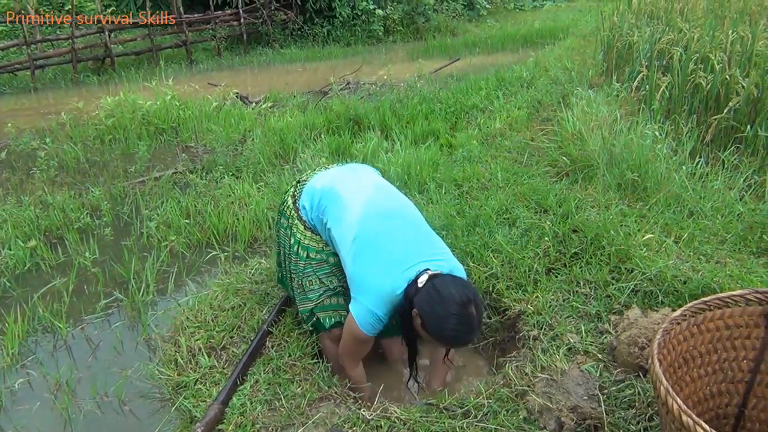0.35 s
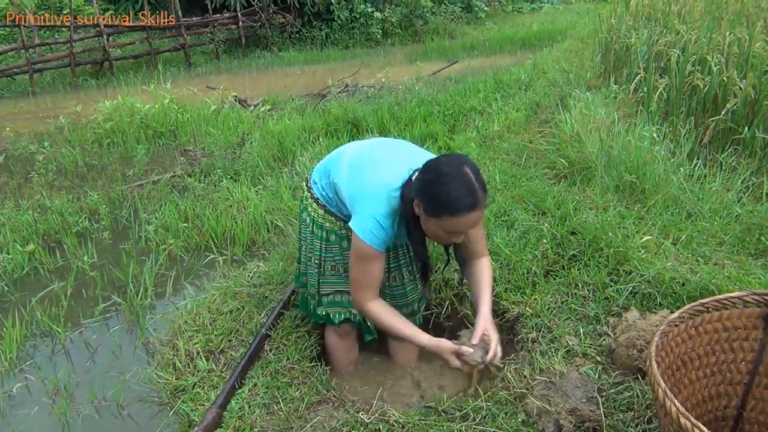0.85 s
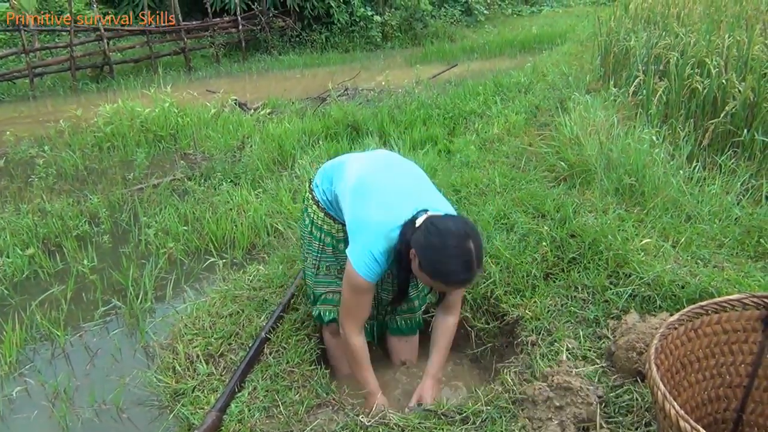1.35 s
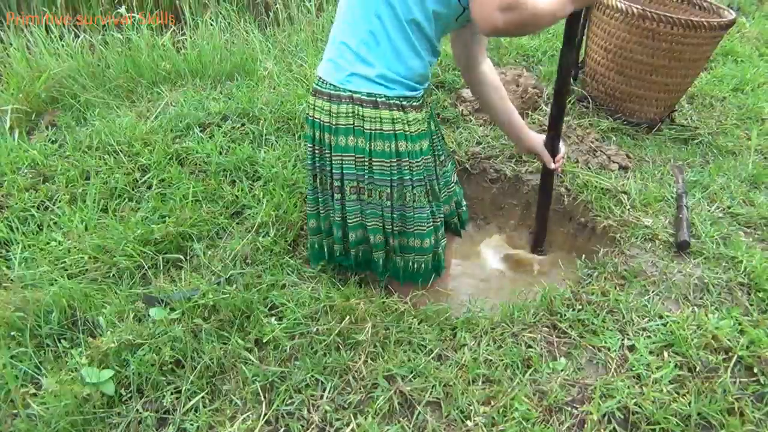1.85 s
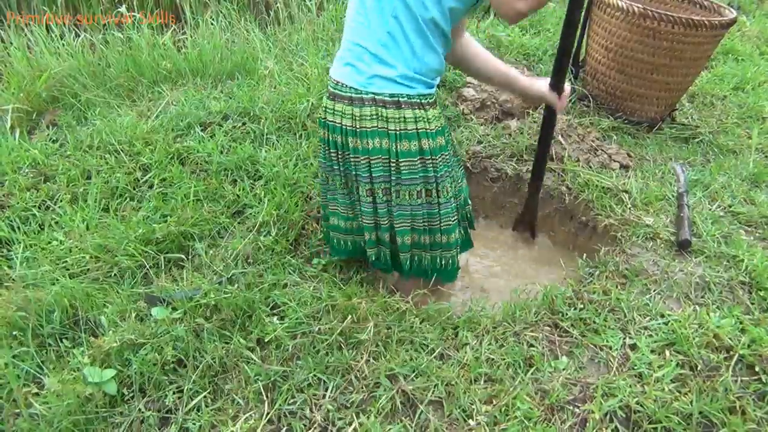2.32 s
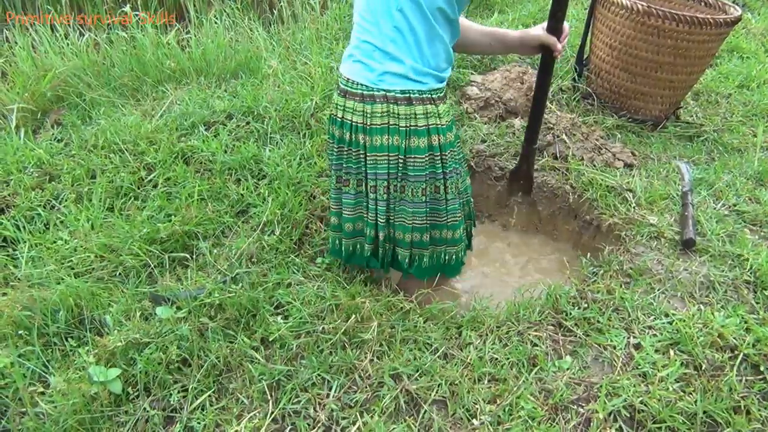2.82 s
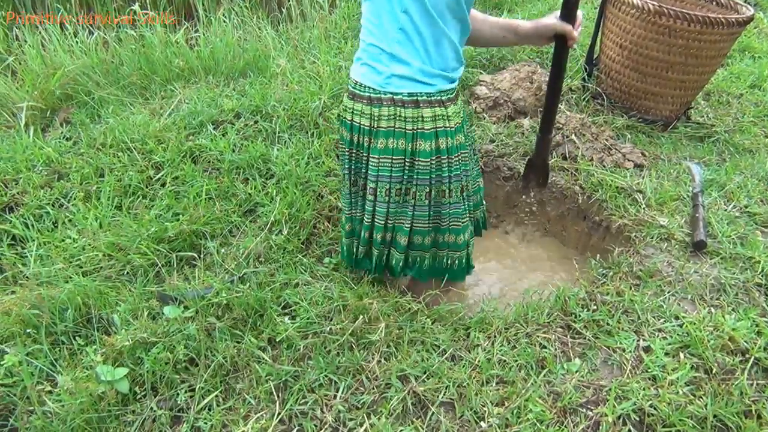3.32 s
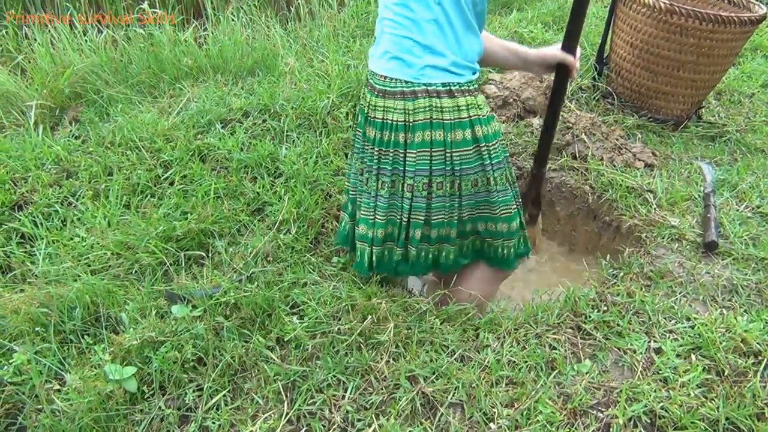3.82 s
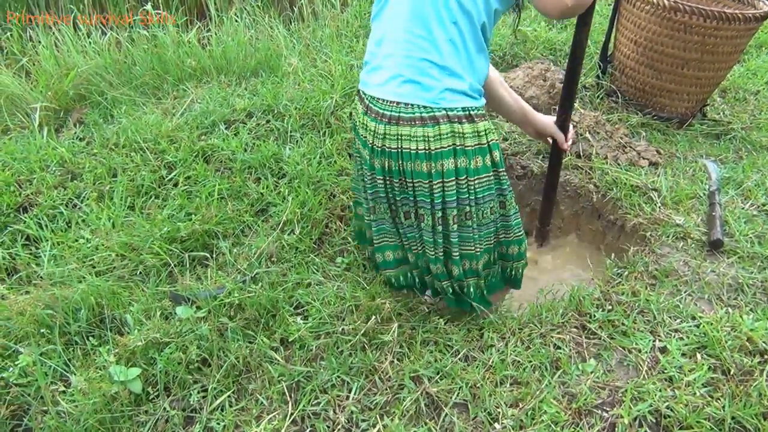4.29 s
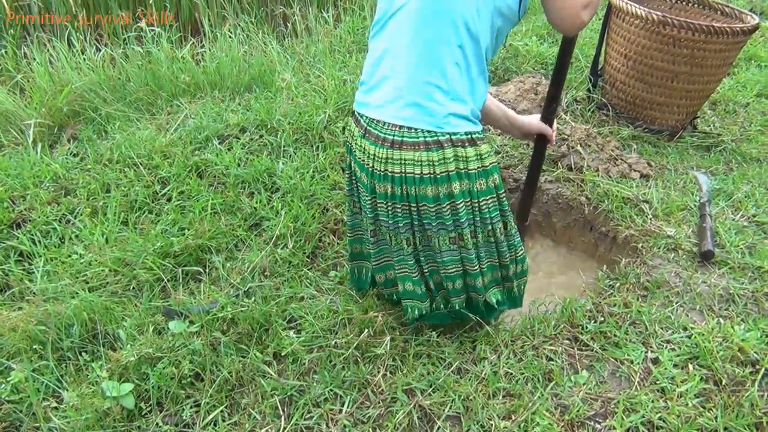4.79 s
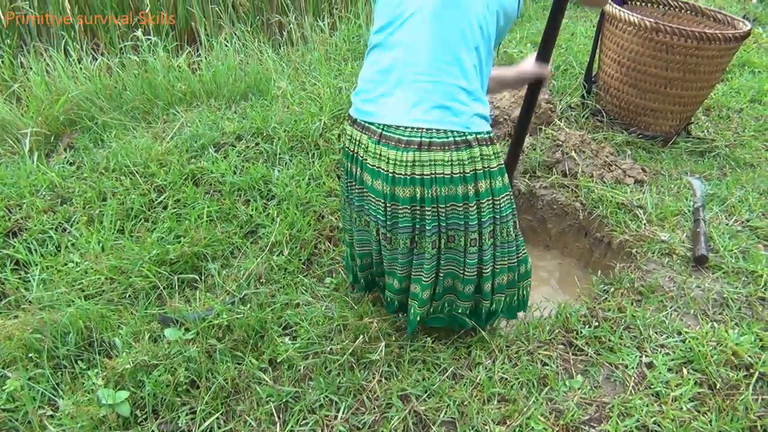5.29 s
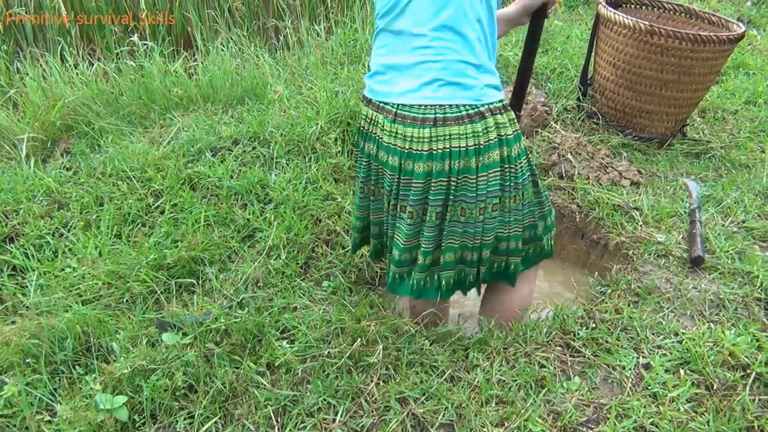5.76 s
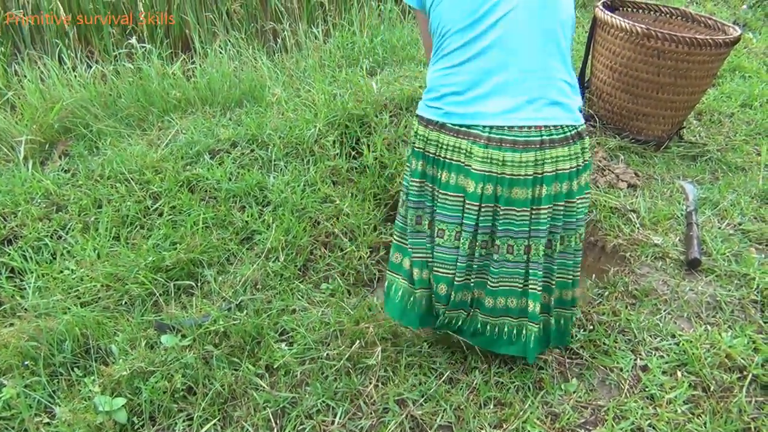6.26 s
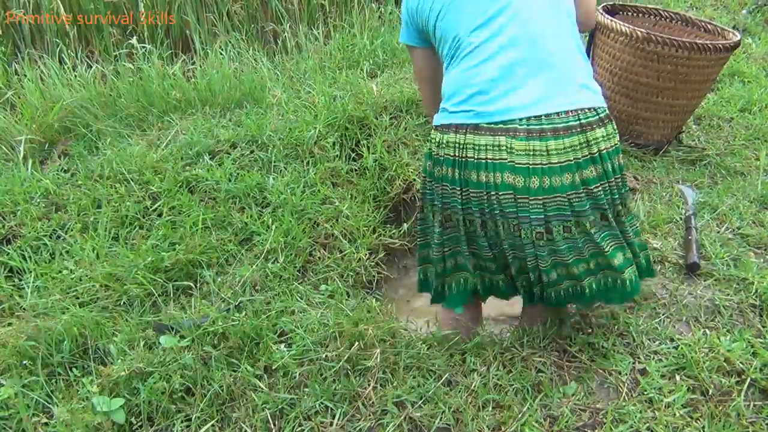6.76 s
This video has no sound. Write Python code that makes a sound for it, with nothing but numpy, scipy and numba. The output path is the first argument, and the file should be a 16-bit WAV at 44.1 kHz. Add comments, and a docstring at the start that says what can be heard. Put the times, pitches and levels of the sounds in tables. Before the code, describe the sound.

Wet scooping, drips and a soft mud thud give way to sharp watery plunges and bubbling plops, over a thin buzzing insect chorus outdoors.

```python
"""Muddy pit in a wet field

Hands scoop mud and drop it on the bank; after a brief silence a pole jabs the flooded earth.
Splashes and sloshes are clouds of damped sines: large bubbles, small bubbles and fine spray.
Single drops, bubbles and dull thuds are damped sines too. Insects sing all around in narrow bands
of pulsing noise, over the soft hiss of the field."""
import sys
import numpy as np
from scipy import signal
from scipy.fft import rfft, irfft, next_fast_len
from scipy.io import wavfile
from scipy.ndimage import uniform_filter1d
from numba import njit

SR = 44100
rng = np.random.default_rng(int(sys.argv[2]) if len(sys.argv) > 2 else 0)


def field_ratio(decibels):
    """Amplitude ratio for a level in dB (20 dB per decade); scalars and array-likes work."""
    return 10 ** (np.asarray(decibels, dtype=float) / 20)


def wav_out(sig):
    """Save sig, one row per channel (or a flat mono array), as 16-bit PCM at SR to the path in sys.argv[1]."""
    wavfile.write(sys.argv[1], SR, np.round(np.clip(np.atleast_2d(sig).T, -1, 1) * 32767).astype(np.int16))


N = 303408
TIME = np.arange(N) / SR
# The brief silence. Times in seconds: fade-out starts, silence starts, silence ends, sound is fully back.
GAP_S = (1.659, 1.662, 1.699, 1.706)


@njit
def ring(start, hz, cycles, glide, size):
    """Damped resonance: each sine swells in about a cycle and dies 60 dB in its cycles, gliding in pitch."""
    out = np.zeros(N)
    for k in range(len(start)):
        length = int(cycles[k] * SR / hz[k]) + 2
        step = np.exp(2j * np.pi * hz[k] / SR - np.log(1000) / length)
        # the pitch moves evenly from hz to glide * hz
        bend = np.exp(2j * np.pi * hz[k] * (glide[k] - 1) / SR / length)
        phasor = size[k] + 0j
        shut = 1.
        for i in range(start[k], min(start[k] + length, N)):
            out[i] += phasor.imag * (1 - shut)
            shut *= 1 - 2 * hz[k] / SR
            phasor *= step
            step *= bend
    return out


def shape(x, points):
    """Linear filtering: the spectrum is weighted by (Hz, dB) points joined on a log frequency axis."""
    hz, db = np.transpose(points)
    size = next_fast_len(N)
    f = np.arange(size // 2 + 1) * SR / size + 1  # 1 Hz up, to avoid log 0
    gain = field_ratio(np.interp(np.log(f), np.log(hz), db))
    return irfft(rfft(x, size) * gain, size)[..., :N]


def unit(x):
    """Power normalisation: scale to rms 1."""
    return x / np.sqrt(np.mean(x ** 2))


def walk(rate):
    """Slow random modulation: random levels, rate of them a second, joined by ramps; rms 1."""
    k = int(SR / rate)
    held = np.repeat(rng.standard_normal(N // k + 1), k)
    return unit(uniform_filter1d(held, k)[:N])


def chorus():
    """Band-limited noise, amplitude modulated, for each kind of insect; broadband noise for the field's hiss."""
    # Spectrum of the hiss. Each row: frequency in Hz, relative density in dB per Hz.
    field = [(40, -2.5), (800, 1.5), (3000, -7.5), (16000, -12.5)]
    # Insect bands. Each row: centre in Hz, width in Hz, mean level in dB before the silence, the same after.
    insects = [(3447, 330, -56.5, -53.5), (5010, 530, -52, -52.5), (8600, 830, -58, -59.5),
               (14000, 120, -71, -74)]
    throb_hz, throb_db = 24.3, 2
    mid_side = field_ratio(-52) * unit(shape(rng.standard_normal((2, N)), field))
    for hz, width, before_db, after_db in insects:
        band = [(hz - 3 * width, -40), (hz - width, -3), (hz, 0), (hz + width, -40)]
        db = np.where(TIME < GAP_S[1], before_db, after_db)
        db = db + walk(3) + 2 * walk(240)  # slow drift and fine pulsing
        throb_phase = 2 * np.pi * np.cumsum(throb_hz + walk(2.07)) / SR
        db = db + throb_db * np.cos(throb_phase)
        mid_side = mid_side + field_ratio(db) * unit(shape(rng.standard_normal((2, N)), band))
    mid, side = mid_side
    return mid + 0.5 * side * np.array([[1], [-1]])


def thuds():
    """Heavily damped impact: wet earth gives four cycles that sink towards half their pitch."""
    # Mud lumps landing and the pole striking bottom. Each row: start in seconds, strength in dB, starting pitch in Hz.
    thud = [(1.044, -19.5, 120), (1.217, -28, 99), (3.53, -9.5, 205)]
    s, db, hz = np.transpose(thud)
    ones = np.ones(len(s))
    return ring((s * SR).astype(np.int64), hz, 4 * ones, .5 * ones, field_ratio(db))


def chirps():
    """Rising bubble resonance: a thin drip's bubble climbs steeply in pitch as it nears the surface."""
    # Each row: start in seconds, strength in dB, starting pitch in Hz.
    chirp = [(0.288, -41, 1270), (0.394, -43, 1430)]
    t60_s, climb_hz_per_s = 0.09, 58000
    s, db, hz = np.transpose(chirp)
    glide = 1 + climb_hz_per_s * t60_s / hz
    return ring((s * SR).astype(np.int64), hz, t60_s * hz, glide, field_ratio(db))


def ticks():
    """Impact burst: a flung drop lands and six droplets ring around its pitch within 5 ms."""
    # Each row: start in seconds, strength of the first droplet in dB, its starting pitch in Hz.
    tick = [(0.4986, -21.5, 1700), (0.778, -18, 12200), (0.8781, -13.5, 3280), (1.1022, -17, 3400),
            (1.61, -10.5, 6670), (2.1329, -14.5, 7900), (2.2282, -15.5, 4740), (2.283, -21, 9100),
            (2.396, -10.5, 3900), (2.467, -15.5, 4370), (2.9684, -7, 2720), (3.142, -22, 4040),
            (4.077, -22.5, 3520), (4.3293, -10, 10740), (4.7022, -6.5, 3400), (5.3935, -12.5, 3910),
            (5.4984, -11.5, 3380), (5.5097, -15, 2590), (6.224, -18.5, 2550)]
    s, db, hz = np.transpose(tick)[..., None]
    late, pitch, weakness = np.moveaxis(rng.random((len(s), 6, 3)), 2, 0)
    # the first droplet has the listed time, pitch and strength
    late[:, 0], pitch[:, 0], weakness[:, 0] = 0, .5, 0
    start = ((s + .005 * late) * SR).astype(np.int64).ravel()
    hz = np.minimum(hz * 3.2 ** (pitch - .5), SR / 3).ravel()
    gain = field_ratio(db - 12.6 * late - 4.2 * weakness).ravel()
    return ring(start, hz, 12 + 0.00088 * hz, 1.16 + 0 * hz, gain)


def plops():
    """Single bubble resonance: gently released bubbles ring for more cycles than those torn off by a blow."""
    # Each row: start in seconds, strength in dB, starting pitch in Hz.
    plop = [(0.0, -23, 2610), (0.711, -26, 758), (0.737, -22, 750), (0.762, -22, 2570), (1.804, -14, 648),
            (1.8236, -9.5, 2150), (1.864, -4, 1386), (2.503, -16, 1550), (2.524, -21, 1930),
            (2.554, -29.5, 2000), (2.578, -31, 3500), (2.656, -40.5, 920), (2.678, -33, 1060),
            (2.968, -12.5, 1448), (3.131, -23.5, 1695), (3.212, -31, 860), (3.223, -29, 1595),
            (3.532, -17, 424), (3.551, -15.5, 528), (3.629, -21.5, 514), (3.823, -19.5, 1570),
            (3.885, -29.5, 830), (4.069, -30, 953), (4.18, -8, 713), (4.229, -23, 734), (4.769, -22, 760),
            (4.834, -21, 845), (4.878, -20.5, 880), (4.984, -32.5, 877), (5.023, -29.5, 870),
            (5.454, -35, 697), (5.58, -32.5, 823), (5.773, -32, 920), (5.825, -31, 935), (5.85, -28, 900),
            (5.978, -6, 810), (6.202, -16.5, 790), (6.27, -27.5, 750), (6.358, -29.5, 1050),
            (6.402, -35, 518), (6.532, -36, 538), (6.613, -33, 603), (6.645, -25, 1508),
            (6.657, -16.5, 2080), (6.795, -13, 770), (6.818, -4.5, 596)]
    s, db, hz = np.transpose(plop)
    glide = 1 + 0.46 * rng.random(len(s))
    return ring((s * SR).astype(np.int64), hz, 0.012 * hz - 0.9 * db, glide, field_ratio(db))


def churn():
    """Energy build-up and decay: each slosh swells fast, holds, then settles; gives levels in dB."""
    # Sloshes. Each row: time of full swell in seconds, hold in seconds, large bubbles in dB,
    # fine spray in dB, settling of the large bubbles in dB per second.
    slosh = [(0, 0.0048, -37.5, -47.5, 197.5), (0.701, 0.2, -39, -41.5, 149),
             (0.913, 0.22, -54, -41.5, 190), (1.426, 0.15, -40.5, -42.5, 113),
             (1.548, 0.083, -34, -54, 165), (1.774, 0.13, -33, -38, 289), (2.02, 0.032, -57, -41, 29),
             (2.387, 0.05, -35, -40.5, 125), (2.957, 0.17, -51.5, -46, 117), (3.575, 0.087, -41, -37, 81),
             (3.986, 0.008, -43.5, -37.5, 205), (4.158, 0.035, -27.5, -42, 99),
             (4.724, 0.048, -35, -47, 200), (4.928, 0.094, -47.5, -50, 265), (5.39, 0.03, -43, -44, 83),
             (5.977, 0.02, -32, -49, 72), (6.192, 0.024, -37, -52.5, 65.5),
             (6.727, 0.014, -24.5, -43.5, 132), (6.813, 0.021, -20.5, -35.5, 306)]
    swell_db_per_s = 457
    spray_settles = 0.77  # share of the large bubbles' settling rate
    calm_large_db, calm_spray_db = -67, -57.5  # the pit never lies quite still
    s, hold, large_db, spray_db, settle = np.transpose(slosh)[..., None]
    swell = swell_db_per_s * np.minimum(TIME - s, 0)
    after = settle * np.maximum(TIME - s - hold, 0)
    large = field_ratio(calm_large_db) ** 2 + np.sum(field_ratio(large_db + swell - after) ** 2, axis=0)
    spray = field_ratio(calm_spray_db) ** 2 + np.sum(field_ratio(spray_db + swell - spray_settles * after) ** 2, axis=0)
    return 10 * np.log10(large), 10 * np.log10(spray)


def stirring():
    """Addition of powers: strengths of large bubbles, small bubbles and spray from churn and splashes."""
    # Splashes. Each row: start in seconds, reference level in dB, balance towards fine spray in dB,
    # reference dying time in seconds (a fall of 16 dB).
    splash = [(0.916, -19, -5.5, 0.021), (1.0383, -14.5, -18, 0.016), (1.394, -21.5, -5, 0.021),
              (1.7407, -13.5, -4, 0.016), (1.7693, -5.5, -13, 0.024), (2.327, -22, -1.5, 0.053),
              (2.3523, -14, -3.5, 0.019), (2.3915, -14, -9.5, 0.02), (2.466, -20.5, -3, 0.0057),
              (2.921, -18, -5.5, 0.044), (3.235, -16, -13.5, 0.007), (3.514, -10, -6.5, 0.016),
              (3.538, -4.5, -9, 0.013), (3.696, -11, -19.5, 0.012), (4.1395, -10, -5, 0.018),
              (4.175, -8, -14.5, 0.014), (4.2742, -7, -17.5, 0.01), (4.7, -16.5, 1.5, 0.023),
              (4.8476, -9.5, -18, 0.011), (5.3216, -9, -11, 0.024), (5.343, -5, -14.5, 0.0078),
              (5.9614, -4.5, -14.5, 0.023), (6.1959, -14, -30, 0.011), (6.69, -6.5, -9, 0.019)]
    large_db, spray_db = churn()
    # random clumps
    spray_db = spray_db + 3.5 * walk(35) + 2.2 * walk(150)
    large_db = large_db + 3 * walk(30)
    small_db = 0.43 * large_db + 0.56 * spray_db + 3.0
    power = field_ratio([large_db, small_db, spray_db]) ** 2
    for s, peak_db, fine_db, dying_s in splash:
        i = int(s * SR)
        t = TIME[:SR // 5][:N - i]
        # large bubbles swell and die fastest, spray slowest
        layers = ((0, -11 - 0.324 * fine_db, 0.59), (1, -4.5, 0.85), (2, fine_db + 4, 1.16))
        for row, rel_db, slow in layers:
            age = t / (dying_s * slow)
            envelope = (1 - np.exp(-age / 0.26)) * field_ratio(-16 * age)
            power[row, i:i + len(t)] += (field_ratio(peak_db + rel_db) * envelope) ** 2
    return np.sqrt(power)


def cloud(strength, count, lo_hz, hi_hz, cycles, glide, scatter_db):
    """Superposed random resonances: stronger water frees more bubbles, and louder ones."""
    crowded_db = -30  # water this strong frees every bubble; calmer water only some
    when, pitch, luck, life, lot = rng.random((count, 5)).T
    start = (when * N).astype(np.int64)
    lo_hz, hi_hz = (lo_hz + 0 * TIME)[start], (hi_hz + 0 * TIME)[start]
    hz = lo_hz * (hi_hz / lo_hz) ** pitch
    # sizes scatter exponentially in dB: a few lie far above the rest (below, if scatter_db is negative)
    size = field_ratio(-scatter_db * np.log(1 - .99 * luck))
    length = cycles * (.5 + life)
    # mean power of the whole cloud, so that its rms follows strength
    power = np.sum(size ** 2 * length * SR / hz) / (4 * np.log(1000) * N)
    share = np.clip(strength[start] / field_ratio(crowded_db), .2, 1)
    size = size * strength[start] / np.sqrt(power * share)
    freed = lot < share
    return ring(start[freed], hz[freed], length[freed], (1 + glide * life)[freed], size[freed])


def water():
    """Superposition of bubble and droplet clouds by pitch, with single plops, chirps and ticks."""
    # Reference pitch of air pockets in the mud. Each row: time in seconds, pitch in Hz.
    pockets = [(0.9, 752), (3.3, 732), (3.5, 501.4), (3.7, 586), (4.15, 723), (6.3, 762), (6.7, 664)]
    large, small, spray = stirring()
    pocket_hz = np.interp(TIME, *np.transpose(pockets))
    gurgle = cloud(large, count=5000, lo_hz=0.82 * pocket_hz, hi_hz=1.36 * pocket_hz,
                   cycles=22., glide=0.22, scatter_db=3.8)
    drips = cloud(small * field_ratio(-1.37), count=7000, lo_hz=1343, hi_hz=3338,
                  cycles=45.0, glide=0.454, scatter_db=4.5)
    fizz = cloud(small * field_ratio(-5), count=30000, lo_hz=1250, hi_hz=5000,
                 cycles=14., glide=.2, scatter_db=3.)
    mist = cloud(spray, count=90000, lo_hz=3380, hi_hz=14800,
                 cycles=3.24, glide=0, scatter_db=-1.0)
    droplets = cloud(spray * field_ratio(-6), count=5000, lo_hz=4000, hi_hz=13000,
                     cycles=24., glide=.1, scatter_db=3.)
    # heavy mud slumps mostly when the water is strongly stirred
    slop = cloud(large * np.sqrt(large) * field_ratio(3.5), count=4000, lo_hz=163, hi_hz=570,
                 cycles=3.2, glide=0, scatter_db=4.0)
    return gurgle + drips + fizz + mist + droplets + slop + plops() + chirps() + ticks()


def scene():
    """Diffuse reflection: the pit, a little right of centre, gets a short echo from banks and grass."""
    # Colour that the pit and the microphone give the water. Each row: frequency in Hz, gain in dB.
    colour = [(30, -17), (250, 7), (800, 1), (1180, 3.5), (1500, 2), (5500, 4.5), (10500, 11.5), (16000, 2)]
    near = shape(water() + thuds(), colour)
    t = TIME[:SR // 10]
    tail = rng.standard_normal((2, len(t))) * field_ratio(-60 * t / 0.1)  # dies 60 dB in 0.1 s
    tail = tail / np.sqrt(np.sum(tail ** 2))
    echo = signal.fftconvolve(near[None], tail, axes=1)[:, :N]
    return near * field_ratio([[-.45], [.45]]) + field_ratio(-9.0) * echo + chorus()


def low_pass(x):
    """Removes everything above the highest recorded frequency."""
    return signal.sosfilt(signal.butter(12, 16960, fs=SR, output="sos"), x)


def record(dry):
    """Soft saturation: the microphone rounds the loudest peaks; the sound fades around the brief silence."""
    rounded = np.tanh(dry)
    mix = rounded * np.interp(TIME, GAP_S, (1, 0, 0, 1))
    return low_pass(mix)


dry = scene()
out = record(dry)
wav_out(out)
```